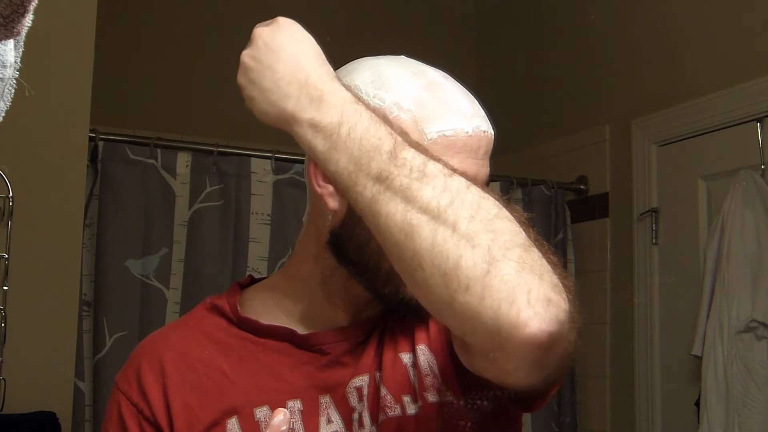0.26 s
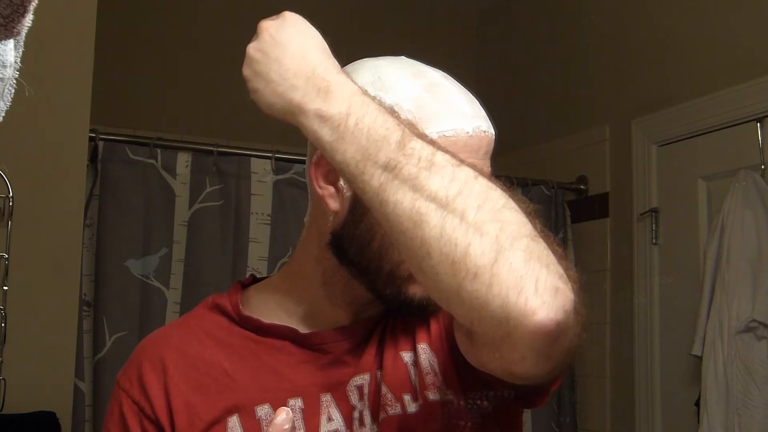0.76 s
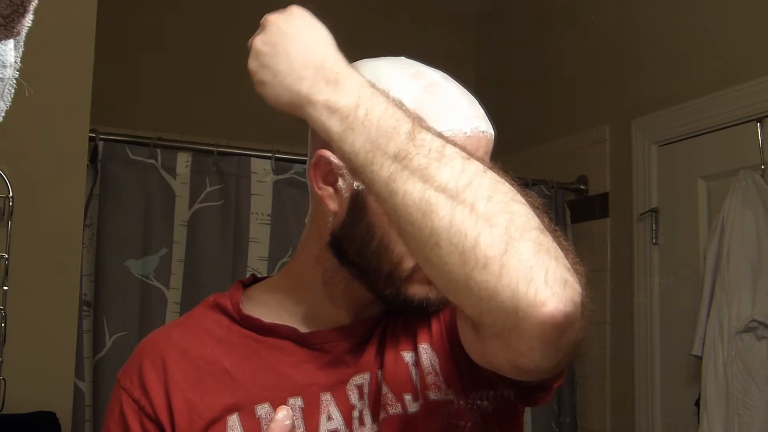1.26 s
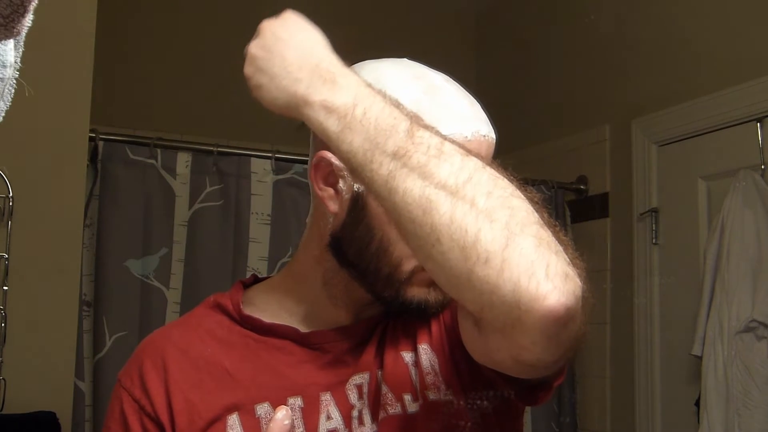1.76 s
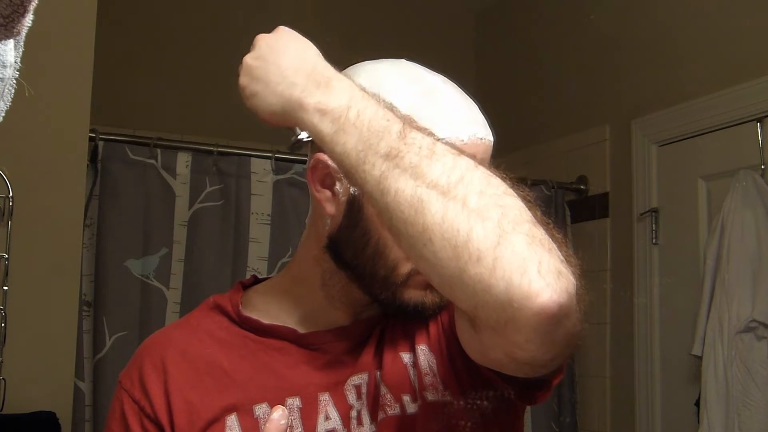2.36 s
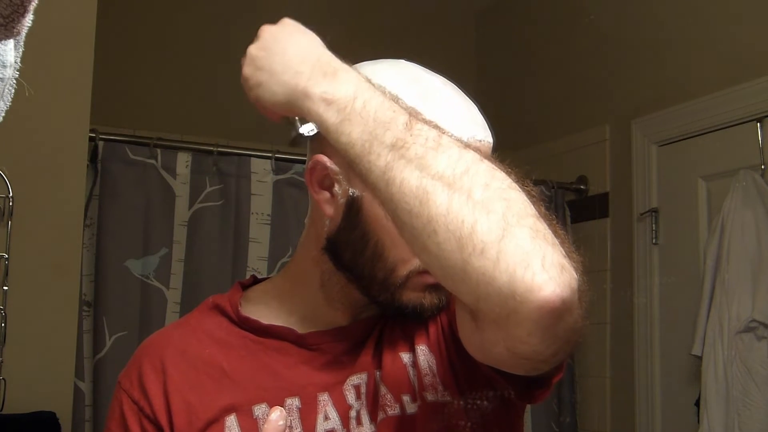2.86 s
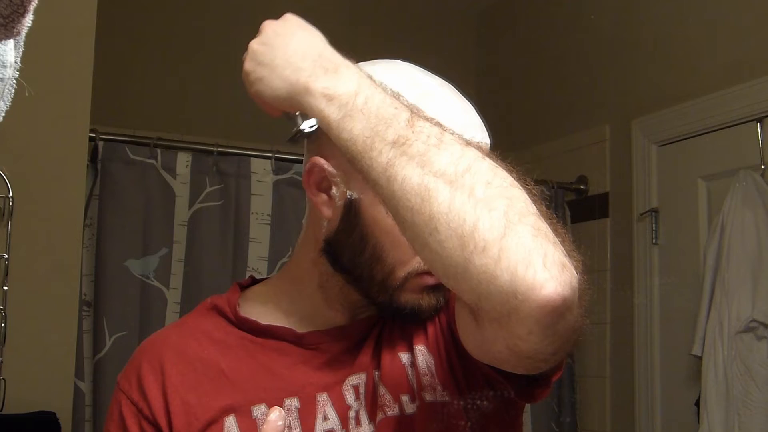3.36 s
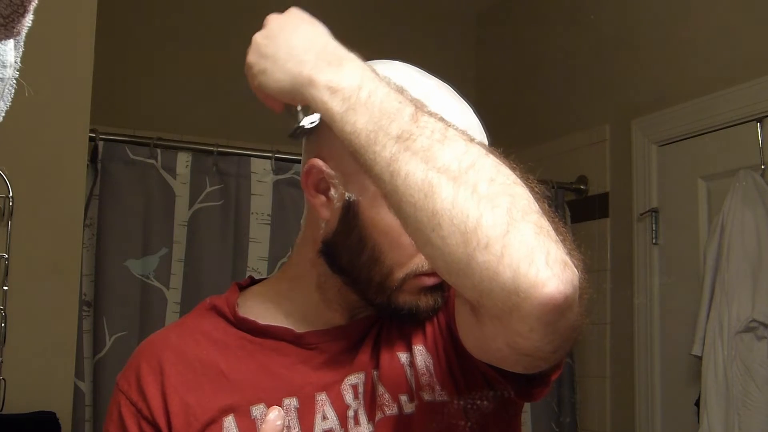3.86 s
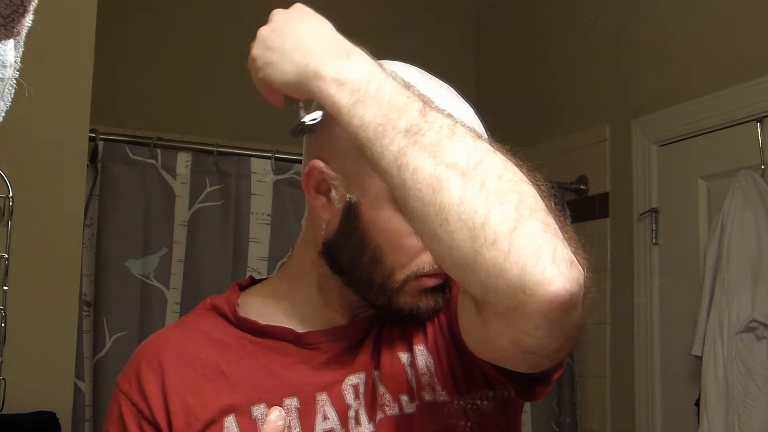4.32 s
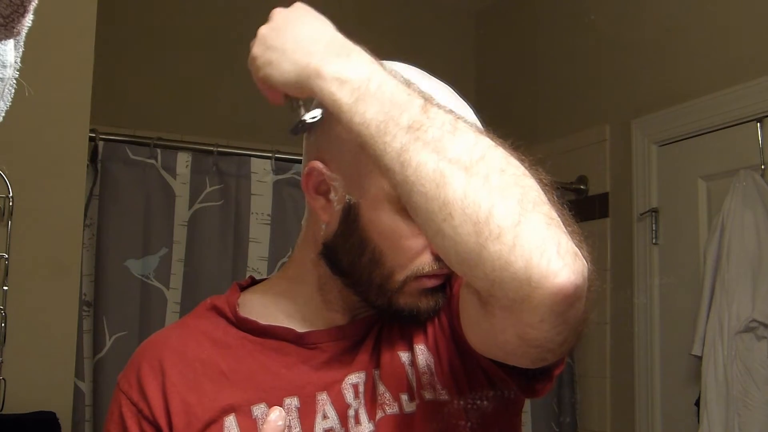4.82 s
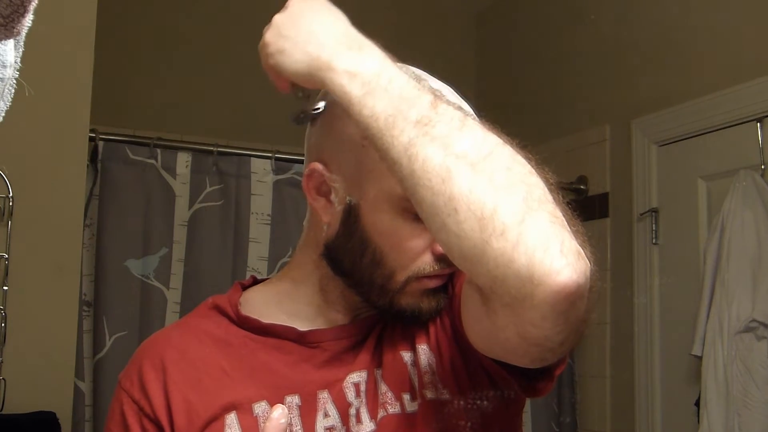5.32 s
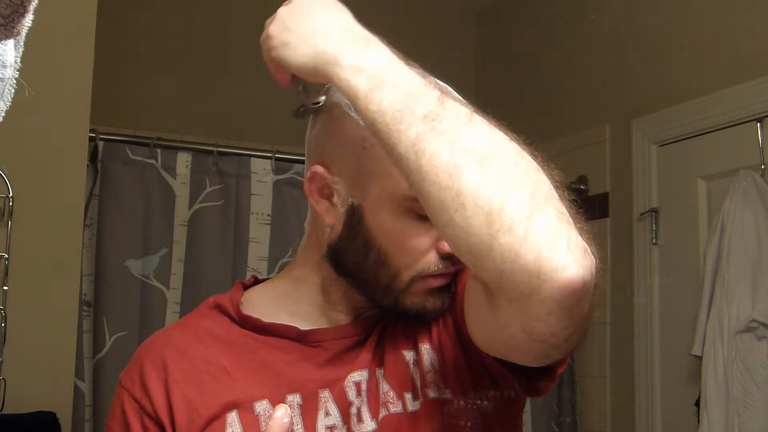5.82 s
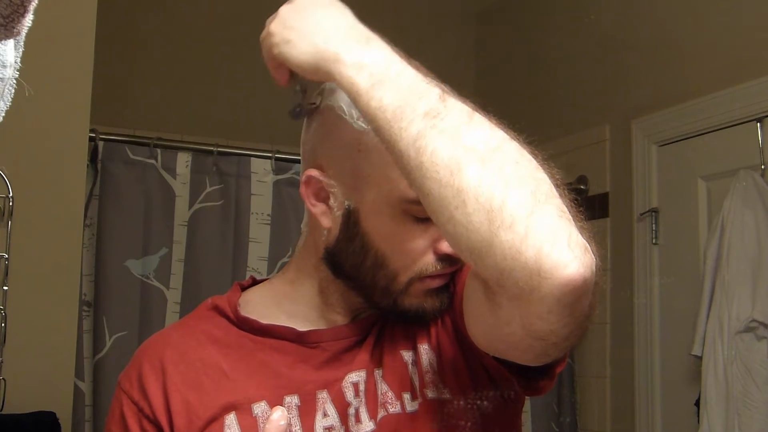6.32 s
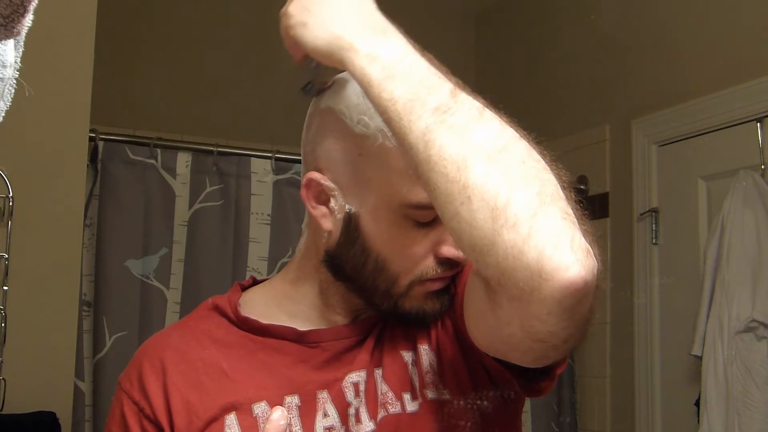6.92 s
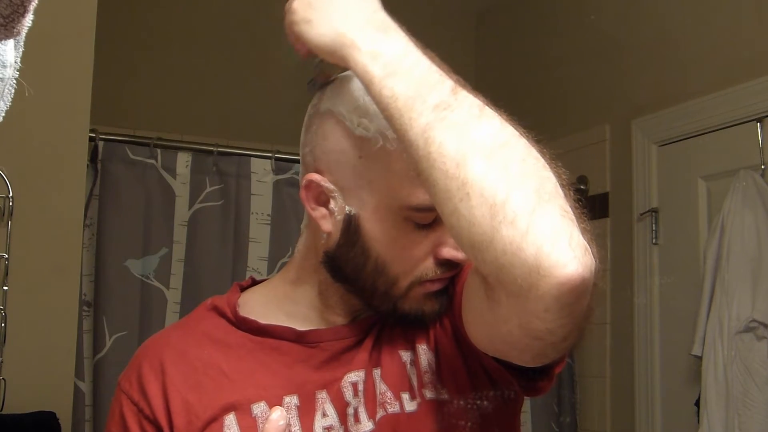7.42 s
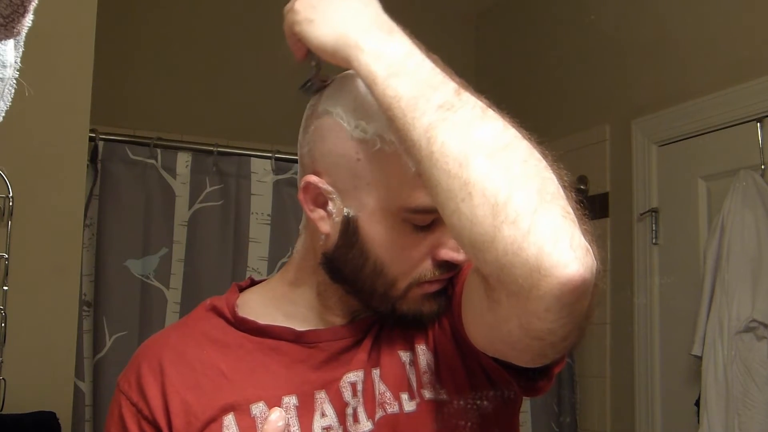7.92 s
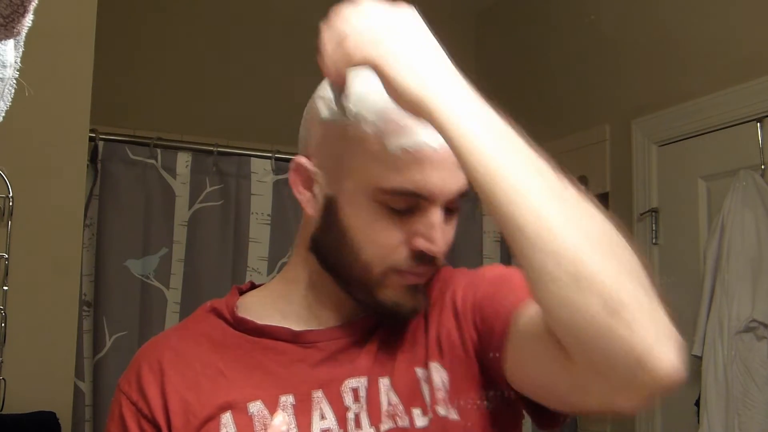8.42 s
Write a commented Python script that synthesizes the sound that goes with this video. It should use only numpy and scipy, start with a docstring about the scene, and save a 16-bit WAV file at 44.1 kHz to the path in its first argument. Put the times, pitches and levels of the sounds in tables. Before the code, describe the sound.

Steady, unhurried head shaving heard close up in stereo: each brief scrape swells and stops with a crisp flick, then a short gap. The strokes gradually gain a hollower, duller body as the razor climbs the head. Scattered ticks and hair clicks stand out; a few muffled thumps fall near the beginning. Finally cloth rustles beside soft bumps and a little knock, over faint room hiss.

```python
"""Small quiet bathroom: a safety razor shaves a lathered scalp in eighteen short strokes.
Each stroke is a swarm of random snaps following the blade's speed, with sharp edge ticks, flicks at the
lift of many strokes, stray hair clicks and a dull skull thrum. Soft damped thumps come early and late; a
sleeve (shaped noise) stirs faintly early and rustles at the end, beside one small knock.
Two spaced microphones with widened treble pick it up, with wall echoes, over faint hum and hiss."""
import sys
import numpy as np
from scipy import signal
from scipy.fft import rfft, irfft, next_fast_len
from scipy.io import wavfile
from scipy.ndimage import uniform_filter1d, map_coordinates

SR = 44100
rng = np.random.default_rng(int(sys.argv[2]) if len(sys.argv) > 2 else 0)


def inscribe(sig):
    """Save sig as 16-bit PCM at rate SR to the path in sys.argv[1].

    A 1-D sig is mono; a 2-D sig holds one channel per row.
    Samples are clipped to [-1, 1] before scaling.
    """
    pcm = np.round(np.clip(np.atleast_2d(sig).T, -1, 1) * 32767)
    wavfile.write(sys.argv[1], SR, pcm.astype(np.int16))


N = 382773

# Levels in the event tables are relative: layer gains follow in scene().
# room noise spectrum: f/Hz, level/dB
AIR_SPECTRUM = [(15, -41), (25, -13.5), (96, -5), (160, -8), (378, -4), (509, -9.5), (741, -9.5),
                (1380, -13.5), (2170, -13.5), (2770, -15.5), (3530, -14.5), (6210, -17.5), (10900, -21),
                (14300, -26.5), (15500, -37)]
# hum bands: f/Hz, full width at half amplitude/Hz, level/dB
HUM_BANDS = [(62, 12, -81), (110.8, 17, -70.5), (283, 26, -82)]
# likeness of diffuse sound at the two microphones: f/Hz, correlation/1
MIC_LIKENESS = [(30, 0.74), (100, 0.74), (300, 0.53), (600, 0), (2000, 0), (12000, 0.21)]
# sharp ticks at the blade edge, from contacts and coarse hairs: t/s, level/dB
TICKS = [(0.0615, -34), (0.3308, -25), (0.382, -31), (0.8567, -33), (2.5004, -35.5), (2.557, -33),
         (3.9417, -33.5), (5.38, -37.5), (5.9202, -32.5), (6.3928, -25.5), (6.4335, -32), (6.7146, -31),
         (6.861, -33.5), (6.869, -31), (6.8854, -36), (6.9285, -30), (6.9587, -27), (6.9774, -35),
         (7.3487, -33), (7.3855, -29), (7.8112, -34), (7.868, -34)]
# spectrum of small sounds at the blade edge: f/Hz, level/dB
EDGE_SPECTRUM = [(400, -33), (1500, -15), (3000, -10.5), (5500, -4), (8500, -2), (12000, -6.5),
                 (15500, -15.5)]
# razor strokes: bite t/s, speeding-up/s, slowing/s, level/dB, swell from bite/dB, sag before lift/dB,
# edge sheen/dB, hollow scalp sound/dB, grip resonance f/Hz, resonance height/dB
STROKES = [(0.108, 0.047, 0.023, -50, 6.5, 9, 0, -14.0, 6000, 0),
           (0.192, 0.087, 0.051, -41, 17, 12.5, 1.5, -23, 5900, 4.5),
           (0.593, 0.18, 0.049, -42.0, 23, 22, 1.0, -19, 5800, 6.5),
           (1.122, 0.072, 0.065, -42.0, 19, -0.5, -1.5, -19, 5730, 4),
           (1.601, 0.042, 0.092, -44.0, 8.5, -0.5, -3, -15.5, 5600, 5),
           (2.045, 0.096, 0.088, -41.5, 11.5, 7.5, -0.5, -16.0, 5130, 3.5),
           (2.56, 0.12, 0.054, -40.5, 9.5, 9.5, 0, -18.5, 6940, 3),
           (3.027, 0.093, 0.099, -41.5, 16.5, 7, -0.5, -16.5, 7000, 1),
           (3.49, 0.12, 0.096, -41.5, 11.5, 8, 0.5, -18.5, 6800, 1),
           (3.968, 0.148, 0.057, -42.5, 16, 10.5, 0.5, -17.0, 4600, 3.5),
           (4.449, 0.141, 0.062, -43.5, 21.5, 4.0, 1, -13, 3160, 3),
           (4.946, 0.13, 0.092, -42.5, 19.5, 7, 0.5, -13, 3120, 4.5),
           (5.439, 0.082, 0.12, -43.5, 21, 7.5, 2.5, -15.5, 3130, 2.5),
           (5.963, 0.068, 0.081, -43.0, 14, 4.5, 1.0, -14.0, 4450, 1.5),
           (6.418, 0.14, 0.059, -44.5, 23.5, 9, 0, -12.5, 5850, 0.5),
           (6.933, 0.09, 0.056, -43.5, 8.0, 6.5, -2, -12, 4600, 1),
           (7.389, 0.031, 0.09, -44.0, 8, 2, -2.5, -9.5, 6100, 0.5),
           (7.877, 0.13, 0.099, -47.0, 2.5, 3, -3, -9, 4440, 0)]
# spectrum of a hair being cut: f/Hz, level/dB
HAIR_SPECTRUM = [(290, -50), (500, -16), (737, -17), (839, -14.5), (1620, -6), (2230, -11.5), (2900, -7.8),
                 (3550, -9), (4020, -7.5), (6270, -3.5), (6930, -3.5), (7560, -2), (11300, -1.5),
                 (14600, -10), (15500, -36)]
# scalp sound's change from bite to lift, rising towards the crown: t/s, change/dB
SCALP_GROWTH = [(0, -8), (4, 8), (8.2, 13.5)]
# mid-rasp fills out as the razor climbs the head: t/s, level/dB
BODY_LEVEL = [(.5, -1.5), (3, -0.5), (5, 0.5), (7.5, 1)]
# dull thrum of the head: f/Hz, level/dB
SKULL_SPECTRUM = [(120, -30), (220, -1), (300, -1), (400, -5), (520, -15), (800, -35)]
# thrum grows towards the crown, then holds nearly level: t/s, level/dB
THRUM_LEVEL = [(1, -75.5), (4, -65), (7.5, -65.5)]
# blade drags up the last hairs and flicks off: letting-go t/s, level/dB, build-up/(dB/s)
FLICKS = [(0.394, -30, 1000), (0.895, -33, 1100), (1.339, -31.5, 548), (1.797, -32, 450), (2.240, -30, 900),
          (2.768, -35.5, 700), (3.2575, -29.5, 1600), (3.712, -33.5, 404), (4.229, -32.5, 400),
          (5.227, -31.5, 750), (5.722, -42.5, 350)]
# sleeve drag: fastest-motion t/s, rise/(dB/s), fall/(dB/s), low rub level/dB, rustle level/dB
ARM_MOVES = [(.8, 25, 52, -64.5, -70), (8.61, 85, 30, -52.5, -52.5)]
# low cloth rub spectrum: f/Hz, level/dB
RUB_SPECTRUM = [(100, -38), (200, -18), (255, -12.5), (290, 1.5), (345, -10.5), (410, -10), (510, -11),
                (700, -33.5), (1500, -56)]
# cloth rustle spectrum: f/Hz, level/dB
CLOTH_SPECTRUM = [(400, -9), (700, -4), (1100, 1.5), (1450, -7), (2000, 0), (2450, -4.5), (2900, 4),
                  (3500, -11), (4000, -3), (4800, -4.5), (6500, -14.5), (11000, -15), (14500, -26)]
# soft thumps: t/s, level/dB, f/Hz, hardness/(dB/octave)
THUMPS = [(1.44, -47, 216.7, -1), (1.477, -45.5, 217.3, -2.5), (1.561, -47, 208, -2),
          (1.64, -55.5, 233, 9.5), (1.69, -58, 233, 9.5), (2.015, -44, 226.7, 4), (2.03, -50, 232.7, 5),
          (2.085, -55, 261, 7), (8.435, -55, 308, -8), (8.49, -47, 312, -6), (8.56, -49, 299, -4),
          (8.645, -49, 305, -8)]
# thump modes: multiple of the pitch/1, level/dB, t60/s
THUMP_MODES = [(.87, -17, 0.14), (1, 0.5, 0.14), (1.35, -4.5, 0.11), (2.05, -11.5, 0.36)]
# small knock as the hand drops: t/s, level/dB, f/Hz
KNOCKS = [(8.5021, -47, 2190)]
# extra travel time to the left microphone as the razor climbs the head: t/s, lag/s
LEFT_LAG = [(0, .000742), (3, .000729), (8.7, .000716)]
# left microphone against right: f/Hz, level/dB
LEFT_SPECTRUM = [(500, -1), (2000, -6.5), (5000, -3), (9000, -2.5), (14000, -2.5)]
# wall reverberation: f/Hz, t60/s
WALL_DECAY = [(200, 0.5), (1500, 0.24), (6000, 0.26), (14000, 0.24)]

SWELL_POWER, SAG_POWER = 1.15, 1.57  # round off a stroke's crest
BITE_DB_PER_S, LIFT_DB_PER_S = 850, 474  # blade engaging, letting go
SHEEN_GROWTH_DB = -1.5  # the edge dulls from bite to lift
SHEEN_FOLLOWS, SCALP_FOLLOWS, STRAY_FOLLOWS = 0.94, 0.29, 0.51  # shares of the speed swell
STRAY_DB_PER_S = 194  # fade outside the stroke
FLICK_STOP_DB_PER_S = 5000
BODY_HZ, BODY_WIDTH_HZ = 3000, 930  # middle of the rasp
BAND_LIMIT_HZ = 15800


def amp(db):
    """Amplitude factor from dB."""
    return 10 ** (np.asarray(db) / 20)


def unit(x):
    """x at rms 1."""
    return x / np.sqrt(np.mean(x ** 2) + 1e-20)


def along(points, hz):
    """(Hz, value) points read on a log frequency axis."""
    f, v = np.transpose(points)
    return np.interp(np.log(hz + 1), np.log(f + 1), v)


def at_time(points, t):
    """(s, value) points read linearly."""
    return np.interp(t, *np.transpose(points))


def bell(hz, centre_hz, width_hz):
    """Resonance curve, 1 at its centre; width at half height."""
    return 1 / (1 + (2 * (hz - centre_hz) / width_hz) ** 2)


def wobble(rate_hz):
    """Smooth random curve through rate_hz knots a second."""
    knots = rng.standard_normal(int(N * rate_hz / SR) + 4)
    return map_coordinates(knots, [np.arange(N) * rate_hz / SR])


def filtered(x, response):
    """x times a (possibly complex) response of frequency."""
    m = next_fast_len(N + SR // 2)
    return irfft(rfft(x, m) * response(np.fft.rfftfreq(m, 1 / SR)), m)[..., :N]


def coloured(x, spectrum, size=1024):
    """x through a minimum-phase filter of the given (Hz, dB) shape, its impulse response scaled to peak 1."""
    level = amp(along(spectrum, np.fft.rfftfreq(size, 1 / SR)))
    # folded cepstrum makes the filter causal
    cepstrum = irfft(np.log(level + 1e-6))
    cepstrum[1:size // 2] *= 2
    cepstrum[size // 2 + 1:] = 0
    response = irfft(np.exp(rfft(cepstrum)))
    return signal.fftconvolve(x, response / np.abs(response).max())[:N]


def add(track, s, sound):
    """Mix a sound into the track at s seconds."""
    part = track[max(round(s * SR), 0):][:len(sound)]
    part += sound[:len(part)]


def snaps(rate_hz, spread_db):
    """Randomly timed impulses of random sign and uneven size, rms 1."""
    hit = rng.random(N) < rate_hz / SR
    size = amp(spread_db * np.clip(rng.standard_normal(N), -2, 2))
    return unit(hit * rng.choice([-1, 1], N) * size)


def diffuse(pair):
    """Unrelated signals become a room field: alike at both microphones mainly in the bass."""
    def mid_and_side(hz):
        turn = np.arccos(np.clip(along(MIC_LIKENESS, hz), -1, 1)) / 2
        return np.array([np.cos(turn), np.sin(turn)])
    mid, side = filtered(pair, mid_and_side)
    return np.array([mid + side, mid - side])


def room_noise(air_db, hum_gain_db):
    """Steady diffuse hiss, plus hum of narrow noise bands that waver by themselves."""
    hiss = filtered(rng.standard_normal((2, N)), lambda hz: amp(along(AIR_SPECTRUM, hz)))
    hum = np.zeros(N)
    for centre_hz, width_hz, db in HUM_BANDS:
        band = filtered(rng.standard_normal(N), lambda hz: bell(hz, centre_hz, width_hz))
        hum += amp(db + hum_gain_db) * unit(band)
    return amp(air_db) * unit(diffuse(hiss)) + hum


def ticks(gain_db, crackle_db, crackle_t60_s):
    """Blade contacts and coarse hairs: one sharp impulse, then a brief decaying crackle of lather."""
    out, t = np.zeros(N), np.arange(SR // 20) / SR
    for s, db in TICKS:
        tick = amp(crackle_db - 60 * t / crackle_t60_s) * rng.standard_normal(len(t))
        tick[0] = 1
        add(out, s, amp(db + gain_db) * tick)
    return coloured(out, EDGE_SPECTRUM)


def regripped(x, width_hz, uneven_tone_db):
    """Razor and hand resonance shifts with each stroke's grip; tone varies a little over time and f."""
    hz, t, z = signal.stft(x, SR, nperseg=256)
    hz = hz[:, None]
    s, rise_s, *_, grip_hz, grip_db = np.transpose(STROKES)
    nearest = np.abs(t[:, None] - s - rise_s).argmin(axis=1)  # by stroke crest
    grip = grip_db[nearest] * bell(hz, grip_hz[nearest], width_hz)
    body = at_time(BODY_LEVEL, t) * bell(hz, BODY_HZ, BODY_WIDTH_HZ)
    # smoothed random gain field
    field = uniform_filter1d(rng.standard_normal(z.shape), size=5, axis=0)
    field = unit(uniform_filter1d(field, size=24, axis=1))
    return signal.istft(z * amp(grip + body + uneven_tone_db * field), SR, nperseg=256)[1][:N]


def strokes(slide_db, coarse_db, clump_db, uneven_db, scalp_hz, sheen_hz,
            rasp_gain_db, sheen_gain_db, scalp_gain_db):
    """Fine and coarse hairs snap in clumps, louder with blade speed; the scalp answers hollowly."""
    hairs = snaps(rate_hz=2600, spread_db=3.5) + amp(coarse_db) * snaps(rate_hz=160, spread_db=1.5)
    sliding = amp(slide_db) * rng.standard_normal(N)
    clumps_db = clump_db * wobble(170) + uneven_db * wobble(45)
    cutting = coloured((hairs + sliding) * amp(clumps_db), HAIR_SPECTRUM)
    cutting = regripped(cutting, width_hz=300, uneven_tone_db=1.0)

    def below(hz, corner_hz):
        return 1 / (1 + (hz / corner_hz) ** 6)
    scalp = unit(filtered(cutting, lambda hz: below(hz, scalp_hz)))
    rasp = unit(filtered(cutting, lambda hz: below(hz, sheen_hz) - below(hz, scalp_hz)))
    sheen = unit(filtered(cutting, lambda hz: 1 - below(hz, sheen_hz)))

    out, now = np.zeros(N), np.arange(N) / SR
    for s, rise_s, fall_s, db, swell_db, sag_db, sheen_db, scalp_db, *_ in STROKES:
        near = np.abs(now - s) < .5
        t = now[near] - s
        before_crest = np.clip(1 - t / rise_s, 0, 1) ** SWELL_POWER
        after_crest = np.clip((t - rise_s) / fall_s, 0, 1) ** SAG_POWER
        speed_db = -swell_db * before_crest - sag_db * after_crest
        bite_db = BITE_DB_PER_S * np.minimum(t, 0)
        lift_db = -LIFT_DB_PER_S * np.maximum(t - rise_s - fall_s, 0)
        travel = np.clip(t / (rise_s + fall_s), 0, 1) - .5  # -.5 at bite, .5 at lift
        edge_db = sheen_db + SHEEN_FOLLOWS * speed_db + travel * SHEEN_GROWTH_DB
        hollow_db = scalp_db + SCALP_FOLLOWS * speed_db + travel * at_time(SCALP_GROWTH, s)
        mix = rasp[near] * amp(rasp_gain_db + speed_db)
        mix += sheen[near] * amp(sheen_gain_db + edge_db)
        mix += scalp[near] * amp(scalp_gain_db + hollow_db)
        out[near] += amp(db + bite_db + lift_db) * mix
    return out


def strays(gain_db):
    """Stiff hairs click on the edge; following speed only in part, they stand out when it is slow."""
    force, t = np.zeros(N), np.arange(N) / SR
    for s, rise_s, fall_s, db, swell_db, sag_db, *_ in STROKES:
        near = np.abs(t - s) < .5
        since = t[near] - s
        speed_db = np.interp(since, [0, rise_s, rise_s + fall_s], [-swell_db, 0, -sag_db])
        outside_s = np.maximum(-since, 0) + np.maximum(since - rise_s - fall_s, 0)
        force[near] += amp(db + gain_db + STRAY_FOLLOWS * speed_db - STRAY_DB_PER_S * outside_s)
    return force * unit(coloured(snaps(rate_hz=170, spread_db=2.5), EDGE_SPECTRUM))


def thrum(gain_db):
    """Blade drag shakes the skull: it builds to the stroke's crest and holds until the lift."""
    force, t = np.zeros(N), np.arange(N) / SR
    for s, rise_s, fall_s, *_ in STROKES:
        force += np.interp(t - s, [0, rise_s, rise_s + fall_s, rise_s + 1.36 * fall_s], [0, 1, 1, 0])
    shaking = unit(coloured(snaps(rate_hz=1500, spread_db=2), SKULL_SPECTRUM))
    return force * amp(gain_db + at_time(THRUM_LEVEL, t)) * shaking


def flicks(gain_db):
    """The last hairs snap ever harder until the edge leaves the skin."""
    force, t = np.zeros(N), np.arange(N) / SR
    for s, db, build_db_per_s in FLICKS:
        near = np.abs(t - s) < .1
        since = t[near] - s
        shape_db = np.minimum(build_db_per_s * since, -FLICK_STOP_DB_PER_S * since)
        force[near] += amp(db + gain_db + shape_db)
    return force * unit(coloured(snaps(rate_hz=2200, spread_db=3), EDGE_SPECTRUM))


def sleeve(crumple_db):
    """Cloth drags over the shoulder: low rub and uneven rustle swell and fade with arm motion."""
    rub = unit(coloured(snaps(rate_hz=900, spread_db=4.0), RUB_SPECTRUM, size=4096))
    cloth = coloured(snaps(rate_hz=3600, spread_db=1), CLOTH_SPECTRUM)
    rustle = unit(cloth * amp(crumple_db * wobble(90)))
    out, t = np.zeros(N), np.arange(N) / SR
    for s, rise_db_per_s, fall_db_per_s, rub_db, rustle_db in ARM_MOVES:
        motion = amp(np.minimum(rise_db_per_s * (t - s), fall_db_per_s * (s - t)))
        out += motion * (amp(rub_db) * rub + amp(rustle_db) * rustle)
    return out


def thumps(gain_db, attack_s):
    """Dull low knocks with a short modal ring; hardness tilts the balance to the upper modes."""
    out, t = np.zeros(N), np.arange(SR // 4) / SR
    for s, db, hz, hard_db in THUMPS:
        ring = np.zeros(len(t))
        for ratio, level_db, t60_s in THUMP_MODES:
            mode_db = level_db + hard_db * np.log2(ratio) - 60 * t / t60_s
            ring += amp(mode_db) * np.sin(2 * np.pi * hz * ratio * t)
        add(out, s, amp(db + gain_db) * ring * (1 - np.exp(-t / attack_s)))
    return out


def knock(gain_db, t60_s, attack_s):
    """A small, quickly damped sine."""
    out, t = np.zeros(N), np.arange(SR // 10) / SR
    for s, db, hz in KNOCKS:
        ring = amp(db + gain_db - 60 * t / t60_s) * np.sin(2 * np.pi * hz * t)
        add(out, s, ring * (1 - np.exp(-t / attack_s)))
    return out


def spaced(x, scatter_db, scatter_t60_s, scatter_hz, count=170):
    """Sound reaches the right microphone first, trailed by glances off the moving hand and forearm."""
    n = np.arange(N)
    left = map_coordinates(x, [n - SR * at_time(LEFT_LAG, n / SR)], order=5)
    left = filtered(left, lambda hz: amp(along(LEFT_SPECTRUM, hz)))
    t, size = np.arange(SR // 100) / SR, N // count + 1
    glances = np.zeros((2, N + SR))
    for start in range(0, N, size):  # new random paths for each block
        paths = rng.standard_normal((2, len(t))) * amp(-60 * t / scatter_t60_s)
        paths /= np.linalg.norm(paths, axis=1, keepdims=True)
        answer = signal.fftconvolve(x[None, start:start + size], paths, axes=1)
        glances[:, start + SR // 1000:][:, :answer.shape[1]] += answer
    # only short waves bounce off something as small as an arm
    glances = filtered(glances[:, :N], lambda hz: hz ** 2 / (hz ** 2 + scatter_hz ** 2))
    return np.array([left, x]) + amp(scatter_db) * glances


def bathroom(x, wet_db, wet_treble_db, early, early_t60_s, count=17):
    """Close walls answer first, then a short tail; redrawn block by block as the arm moves."""
    echo, size = np.zeros((2, N + SR)), N // count + 1
    for start in range(0, N, size):
        hz, t, z = signal.stft(rng.standard_normal((2, SR // 3)), SR, nperseg=256)
        decay = amp(-60 * t / along(WALL_DECAY, hz)[:, None]) + early * amp(-60 * t / early_t60_s)
        tail = signal.istft(z * decay, SR, nperseg=256)[1]
        tail /= np.linalg.norm(tail[0])
        answer = signal.fftconvolve(x[None, start:start + size], tail, axes=1)
        echo[:, start + SR // 600:][:, :answer.shape[1]] += answer
    tone = [(1000, wet_db), (9000, wet_treble_db)]
    return diffuse(filtered(echo[:, :N], lambda hz: amp(along(tone, hz))))


def scene():
    """Razor, thumps, knock and sleeve in the bathroom."""
    noise = room_noise(air_db=-60.58, hum_gain_db=-.7)
    edge = ticks(gain_db=2, crackle_db=-25, crackle_t60_s=0.031)
    scrape = strokes(slide_db=-10, coarse_db=-10, clump_db=0.4, uneven_db=0.68,
                     scalp_hz=2230, sheen_hz=6640,
                     rasp_gain_db=-.5, sheen_gain_db=-1.5, scalp_gain_db=-1.13)
    edge += strays(gain_db=-9.5)
    body = thrum(gain_db=-1)
    edge += flicks(gain_db=-7.5)
    body += sleeve(crumple_db=2.0)
    body += thumps(gain_db=-3.0, attack_s=0.0013)
    body += knock(gain_db=2, t60_s=0.032, attack_s=.002)
    direct = spaced(scrape + edge, scatter_db=-3.5, scatter_t60_s=0.024, scatter_hz=4840)
    direct += amp(-1) * body
    walls = bathroom(scrape + amp(-3) * edge + amp(-4.0) * body,
                     wet_db=0.5, wet_treble_db=-5, early=1.0, early_t60_s=0.044)
    return (direct + walls + noise) * amp([[-.2], [.2]])  # left, right trim


def widened(pair, share, corner_hz, damping):
    """High-passed cross-feed lifts the treble of the difference between the microphones."""
    def lift(hz):
        s = 1j * hz / corner_hz
        cross = share * s * s / (s * s + damping * s + 1)
        return (1 + cross) / (1 - cross)
    mid = (pair[0] + pair[1]) / 2
    side = filtered((pair[0] - pair[1]) / 2, lift)
    return np.array([mid + side, mid - side])


def record(dry):
    """The recorder widens the stereo and keeps nothing above its band limit (600 Hz wide slope)."""
    wide = widened(dry, share=0.44, corner_hz=4600, damping=1.8)
    return filtered(wide, lambda hz: np.clip((BAND_LIMIT_HZ - hz) / 600 + .5, 0, 1))


dry = scene()
out = record(dry)
inscribe(out)
```